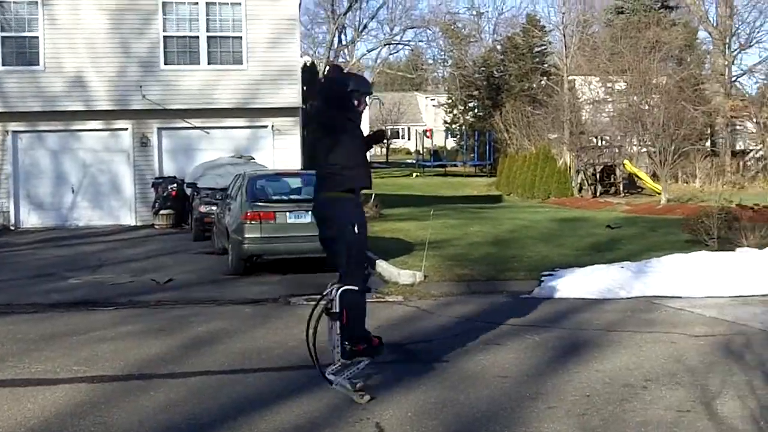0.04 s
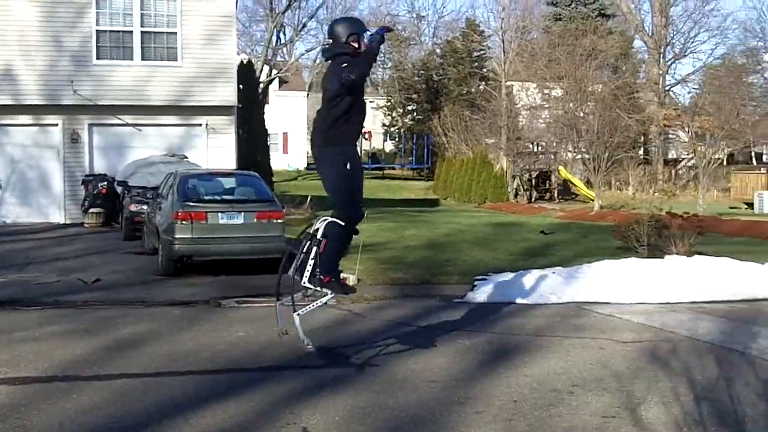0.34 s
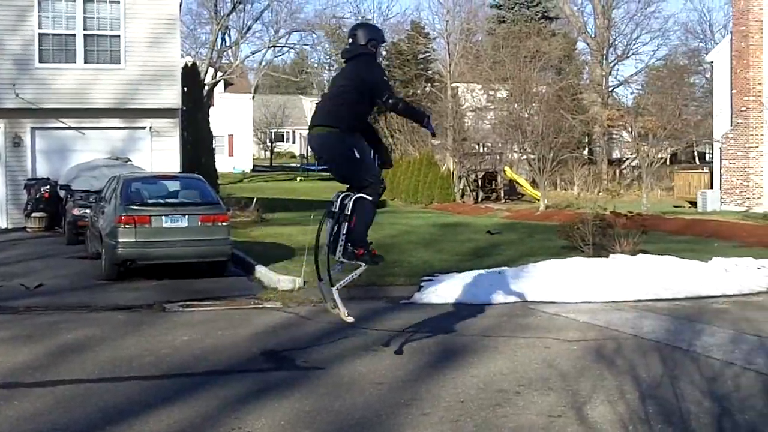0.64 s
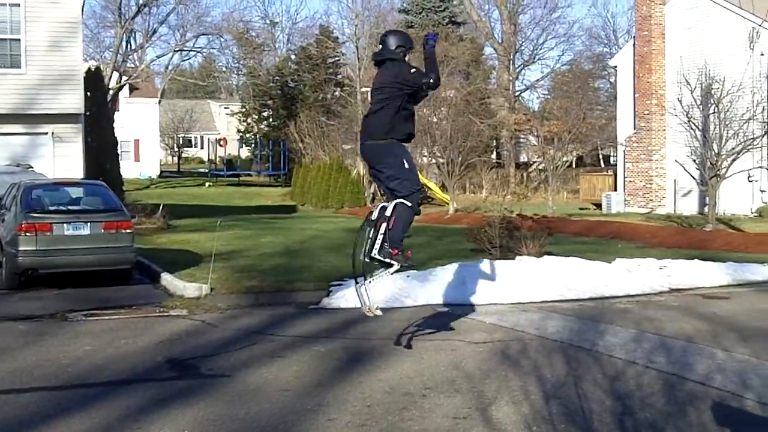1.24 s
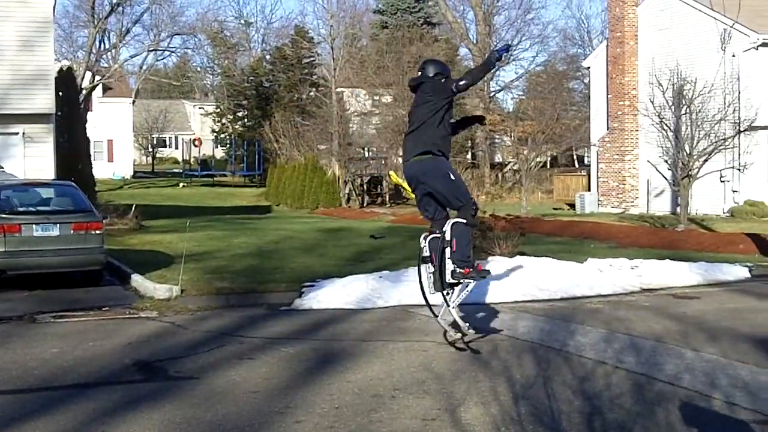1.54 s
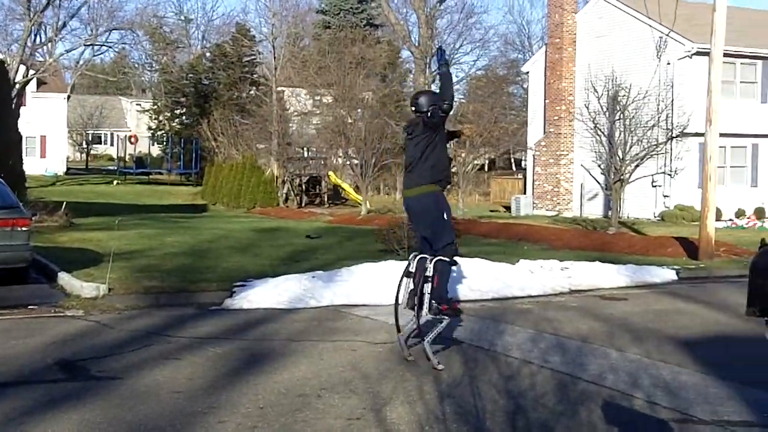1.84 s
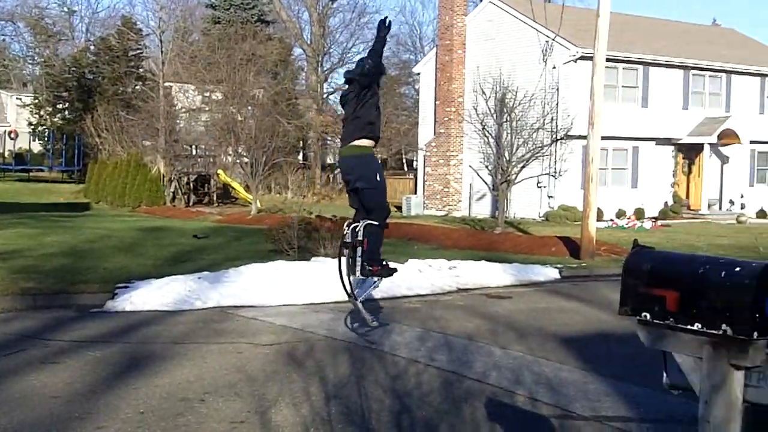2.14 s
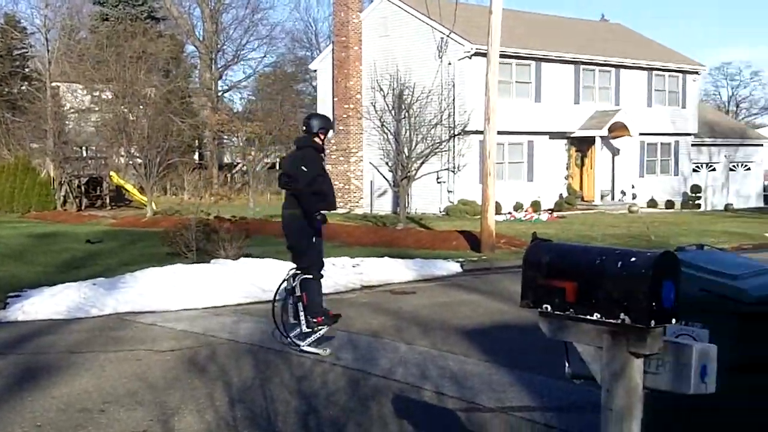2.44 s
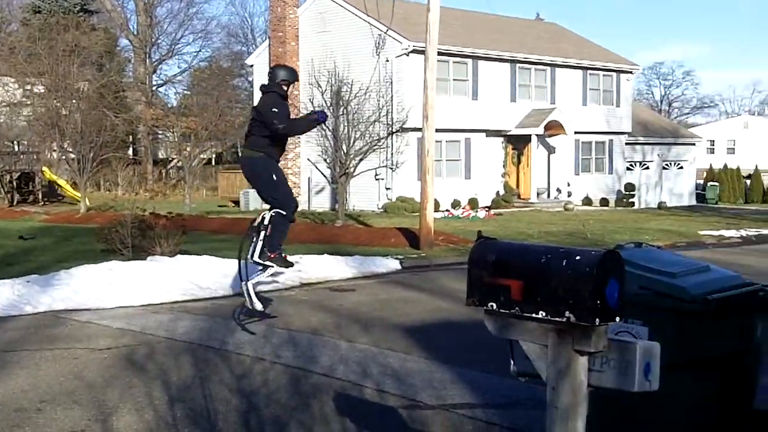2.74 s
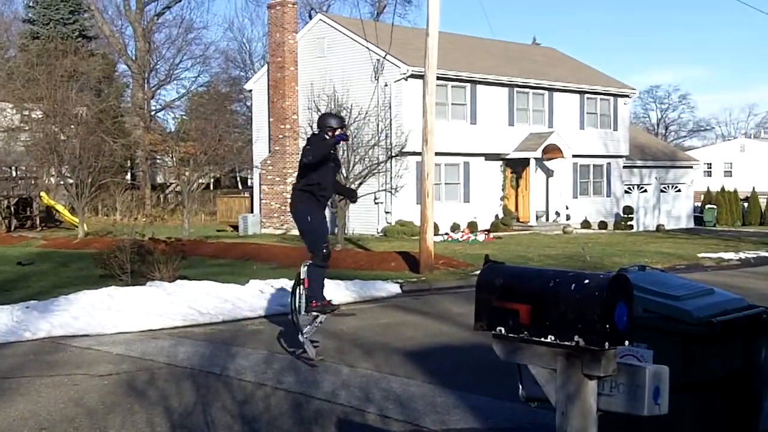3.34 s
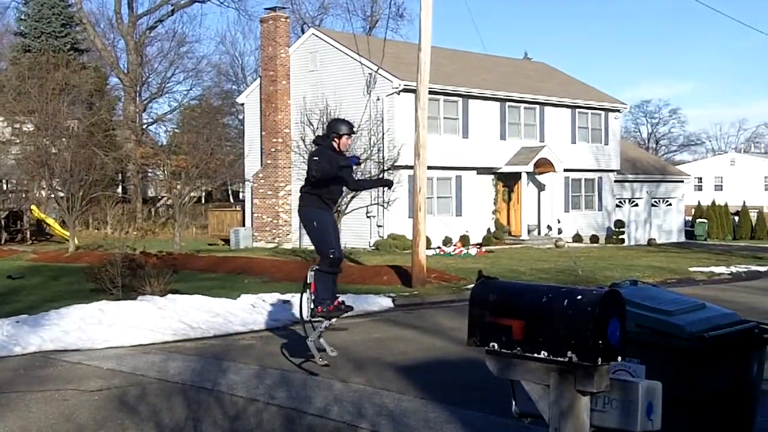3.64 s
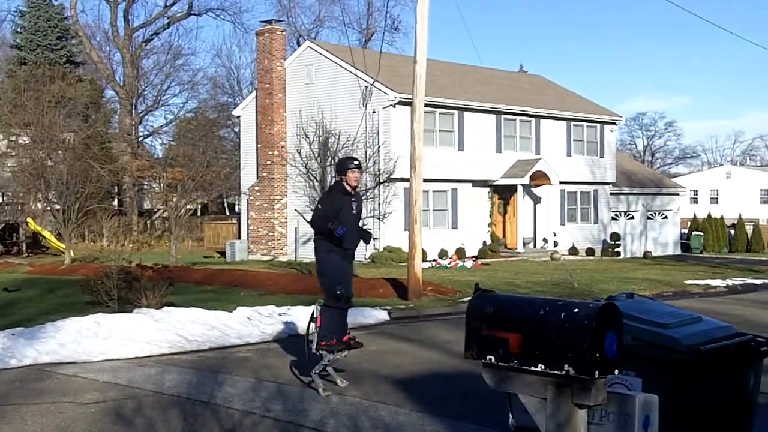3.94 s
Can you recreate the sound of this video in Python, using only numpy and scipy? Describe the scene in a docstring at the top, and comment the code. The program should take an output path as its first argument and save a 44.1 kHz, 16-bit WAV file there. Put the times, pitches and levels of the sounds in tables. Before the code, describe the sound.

Spring stilts land on pavement at about 0.2, 1.0, 1.9, 2.6, 3.3 and 4.0 seconds, each time with a rubbery thump, hollow knock and metal clack that echo thinly off houses. Grit crunches after the landings, and the bindings softly rub, tick and creak between them. Light wind rumbles on the microphone throughout, over faint distant traffic. One far bird calls very faintly near 2.3 seconds.

```python
"""Spring stilts on a suburban street

Someone bounces along, landing about every 0.75 s. Each impact excites a rubber thump, a hollow knock
of the leaf spring and a clack of the metal frame. Friction does the rest: grit crunches as the springs
load, and the bindings rub, tick, stutter and creak. Wind buffets the microphone over distant traffic
and one far bird, and the houses return a thin echo."""
import sys
import numpy as np
from scipy import signal
from scipy.fft import rfft, irfft
from scipy.io import wavfile
from scipy.ndimage import uniform_filter1d

SR = 44100
rng = np.random.default_rng(int(sys.argv[2]) if len(sys.argv) > 2 else 0)


def output_pcm(signal):
    """Save a mono or channel-first signal as 16-bit PCM at the path in sys.argv[1].

    Samples are clipped to [-1, 1] before scaling.
    """
    pcm = np.clip(np.atleast_2d(signal).T, -1, 1) * 32767
    wavfile.write(sys.argv[1], SR, np.round(pcm).astype(np.int16))


N = 176400

# Spectrum of far roads. Each row: frequency in Hz, relative level in dB.
TRAFFIC_SPECTRUM = [(150, -24.5), (250, -11), (370, -10), (600, -6.5), (950, -1), (1300, -4.5),
                    (1730, -7.5), (2650, -18.5), (4500, -30.5), (6500, -30), (9000, -41), (12500, -40.5),
                    (14900, -54)]
# One bird call: start in seconds, length in seconds, level in dB, pitch in Hz, arch as a share of pitch.
BIRD_CALL = (2.335, .1, -49, 1440, .08)
# Spectrum of the wind rumble. Each row: frequency in Hz, relative level in dB.
WIND_SPECTRUM = [(8.8, -31), (15, 13.5), (34, 3), (86, -9.5), (107, -13), (123, -19), (145, -23.5),
                 (178, -34.5), (400, -49), (520, -71), (880, -120)]
# Strength of the rumble. Each row: time in seconds, level in dB.
WIND_LEVELS = [(0, -25), (.55, -20.5), (.95, -29), (1.7, -23), (2.2, -26.5), (2.8, -29), (3.4, -28.5),
               (4, -26.5)]
# Gusts. Each row: centre in seconds, half length in seconds, level in dB, upper frequency in Hz.
GUSTS = [(0.33, 0.03, -28.5, 111), (0.501, 0.046, -29, 142), (0.624, 0.056, -36, 220),
         (1.208, 0.032, -22.5, 99.6), (1.46, 0.066, -30.5, 109), (1.778, 0.034, -27, 129),
         (1.879, 0.0082, -26, 126), (2.38, 0.014, -31.5, 257), (2.66, 0.011, -41.5, 300),
         (3.262, 0.042, -21.5, 36.4), (3.389, 0.0033, -39, 305)]
# Echo from the houses. Each row: frequency in Hz, time to fall 60 dB in seconds.
ECHO_DECAY = [(200, 0.56), (1500, 0.89), (4000, 0.63), (8000, 0.46), (13000, 0.27)]

# Grit under a foot. Each row: start in seconds, length in seconds, level in dB, tilt in dB per octave.
CRUNCHES = [(.232, 0.091, -39.5, 0), (1.062, 0.082, -45, 0.5), (1.14, 0.089, -45, -1.5),
            (1.878, 0.075, -41, 1.3), (2.598, 0.087, -46.5, 0), (3.325, 0.057, -50.5, 2),
            (3.381, .013, -45, -10), (3.451, 0.0081, -40.5, -5)]
# Spectrum of the grit. Each row: frequency in Hz, relative level in dB.
GRIT_SPECTRUM = [(290, -14), (500, -8), (1090, -11), (1300, -5), (2000, 0.5), (3500, -2), (4700, -3),
                 (6300, -4), (9500, -10.5), (12000, -19), (14900, -31)]
# Bindings and clothes rub. Each row: start and length in seconds, level in dB, tilt in dB per octave.
RUBS = [(.09, .06, -57, -12), (.321, .008, -55, 17), (.359, 0.022, -41.5, 3.5), (.375, 0.14, -54, -7),
        (.705, 0.14, -64.5, -4), (.832, 0.073, -57, -4.5), (1.21, 0.17, -52, -10.5), (1.58, 0.073, -65, -1),
        (1.695, 0.071, -63, -5.5), (1.95, 0.13, -67, -5), (2.002, 0.02, -41, -3), (2.03, 0.096, -57, -6.5),
        (2.708, 0.048, -48.5, -10), (2.79, 0.047, -52.5, -4), (3.04, 0.025, -63, -7),
        (3.441, 0.029, -55.5, -1), (3.505, 0.067, -55, -7), (3.612, 0.083, -56.5, -5),
        (3.79, .08, -69.5, -7)]
# Spectrum of rubs, ticks and stutters. Each row: frequency in Hz, relative level in dB.
BINDING_SPECTRUM = [(800, -26), (2000, -4), (3800, -1.5), (5000, -0.5), (6500, 3), (8500, -1.5),
                    (11000, -11.5), (15000, -35)]
# Buckle ticks. Each row: start in seconds, level in dB.
BUCKLE_TICKS = [(.423, -38.5), (.443, -41.5), (.540, -51.5), (0.786, -51), (.95, -47), (1.28, -42),
                (2.058, -42.5), (2.09, -43), (2.679, -47), (2.806, -50), (2.847, -46.5), (3.091, -45.5),
                (3.138, -49)]
# Runs of slips. Each row: start and length in seconds, level in dB, first and last slips per second.
STUTTERS = [(1.134, .034, -52, 190, 120), (1.248, .032, -60, 190, 90), (2.698, 0.034, -49.5, 165, 480)]
# Springs and joints creak. Each row: start and length in seconds, level in dB,
# first and last pitch in Hz, waver as a share of pitch.
CREAKS = [(0.174, 0.039, -53.5, 6200, 6100, .055), (1.173, 0.04, -46, 4100, 3870, 0.039),
          (1.304, .02, -55, 3760, 3610, .05), (2.0145, 0.0077, -37, 3830, 4270, .005),
          (2.022, 0.02, -60, 4300, 4120, .008), (3.457, 0.02, -58, 3890, 4030, .019)]
# Harmonics of a creak, from the fundamental up. Each entry: relative level in dB.
CREAK_HARMONICS = [4, 2, -13]

# Modes of the leaf spring. Each row: frequency in Hz, relative level in dB, seconds to fall 60 dB.
SPRING_MODES = [(322.5, 1.5, 0.049), (440, -1, 0.032), (560, -1, 0.037), (684, -2, 0.026),
                (810, -6.5, 0.038), (1055, -3.5, 0.039)]
# Modes of the metal frame. Each row: frequency in Hz, relative level in dB, seconds to fall 60 dB.
FRAME_MODES = [(1243, 4, 0.011), (1795, -9.5, 0.091), (2124, -1, 0.019), (2812, -13, 0.076),
               (3694, 7.5, 0.015), (3650, -17, 0.061), (6170, -22, 0.054)]
# Spectrum of the frame's clack. Each row: frequency in Hz, relative level in dB.
CLACK_SPECTRUM = [(200, 9), (500, -23.5), (950, -8.5), (1300, 9), (1600, -1.5), (2100, 1), (3000, -5.5),
                  (3800, -7.5), (4900, -9), (6300, -10), (7500, -22.5), (9600, -27), (12000, -44.5),
                  (14900, -57)]
# A foot lands. Each row: time in seconds, thump level in dB, thump pitch in Hz, knock level in dB,
# knock tilt in dB per octave, clack level in dB, clack tilt in dB per octave,
# clack decay constant in seconds, frame ring level in dB.
LANDINGS = [(0.2164, -21, 210, -26, 3.5, -28, 3, 0.0038, -31),
            (0.221, -24, 204, -21.5, 3.5, -14.5, 3.5, 0.0043, -25),
            (1.0443, -20, 162, -21.5, 1, -16, 5, 0.0051, -19),
            (1.8464, -23, 152, -29, -1.5, -18, 6.5, 0.0027, -23),
            (1.867, -18.5, 164, -26, 1, -23, 5, 0.0043, -31),
            (2.586, -20.5, 186, -31, -10.5, -26, 7.5, 0.0032, -28.5),
            (2.594, -30.5, 190, -36.5, 2.5, -32, 1.5, 0.0053, -39),
            (3.303, -20.5, 194, -36.5, 3, -23, -1, 0.0033, -41),
            (3.315, -21.5, 201, -29.5, -2, -19.5, 3, 0.0046, -25.5),
            (3.973, -19, 210, -29.5, -9, -22.5, 3.5, 0.0063, -28.5)]


def amp(db):
    """Amplitude grows tenfold for every 20 dB."""
    return 10 ** (np.asarray(db) / 20)


def unit(x):
    """Normalisation to an rms of 1."""
    return x / np.sqrt(np.mean(x ** 2) + 1e-20)


def read(points, hz):
    """Interpolation of a table on a logarithmic frequency axis."""
    table_hz, value = np.transpose(points)
    return np.interp(np.log(hz + 1), np.log(table_hz + 1), value)


def add(mix, start, sound):
    """Superposition: a sound joins the mix at a time in seconds."""
    part = mix[max(round(start * SR), 0):][:len(sound)]
    part += sound[:len(part)]


def colour(x, spectrum, tilt_db=0):
    """Minimum-phase filtering, tilted per octave above 500 Hz; white noise keeps its power."""
    hz = np.fft.rfftfreq(8192, 1 / SR)
    gain = unit(amp(read(spectrum, hz) + tilt_db * np.log2(np.maximum(hz, 500) / 500)))
    log_gain = np.log(np.maximum(np.r_[gain, gain[-2:0:-1]], 1e-5))
    response = np.exp(np.conj(signal.hilbert(log_gain)))
    taps = np.fft.ifft(response).real[:4096] * np.hanning(8192)[4096:]
    return signal.fftconvolve(x, taps)[:len(x)]


def drift(rate_hz):
    """Low-pass noise: a random fluctuation of rms 1, up to the given rate."""
    hz = np.fft.rfftfreq(N, 1 / SR)
    return unit(irfft(rfft(rng.standard_normal(N)) / (1 + (hz / rate_hz) ** 4), N))


def traffic():
    """Incoherent summation: far roads merge into a nearly steady wash."""
    level_db = -49.5 + .5 * drift(rate_hz=36)
    return amp(level_db) * unit(colour(rng.standard_normal(N), TRAFFIC_SPECTRUM))


def bird():
    """Frequency modulation: a far bird's faint tone arches up and back as it swells and fades."""
    start, length, db, pitch_hz, arch = BIRD_CALL
    out = np.zeros(N)
    swell = np.sin(np.pi * np.arange(0, length, 1 / SR) / length)
    hz = pitch_hz * (1 + arch * swell + 0.017 * drift(rate_hz=200)[:len(swell)])
    add(out, start, amp(db) * swell * np.sin(2 * np.pi * np.cumsum(hz) / SR))
    return out


def wind():
    """Turbulent pressure at the microphone: a lumpy rumble, with short gusts that reach higher."""
    t = np.arange(N) / SR
    rumble = unit(colour(rng.standard_normal(N), WIND_SPECTRUM) * amp(4.4 * drift(rate_hz=3.7)))
    out = rumble * amp(np.interp(t, *np.transpose(WIND_LEVELS)))
    for centre, half_length, db, top_hz in GUSTS:
        swell = np.exp(-((t - centre) / half_length) ** 2)
        eddies = drift(top_hz)
        gust = swell * (eddies - uniform_filter1d(eddies, int(2 * SR / top_hz)))
        out += amp(db) * gust * np.linalg.norm(swell) / np.linalg.norm(gust)
    return out


def street_echo(x, level_db=-15.5, echoes_per_s=2500, onset_s=0.012):
    """Scattering: houses and trees return sparse reflections, each band decaying at its own rate."""
    onset = np.minimum(np.arange(SR) / SR / onset_s, 1)
    reflections = rng.standard_normal(SR) * (rng.random(SR) < echoes_per_s / SR) * onset
    hz, t, bands = signal.stft(reflections, SR, nperseg=256)
    tail = signal.istft(bands * amp(-60 * t / read(ECHO_DECAY, hz)[:, None]), SR)[1]
    return amp(level_db) * signal.fftconvolve(x, tail / np.linalg.norm(tail))[:N]


def friction(strokes, spectrum, slips_per_s, spread_db, rise, fall):
    """Sliding friction: dense, uneven slips swell and fade; rise and fall are shares of a stroke."""
    out, t = np.zeros(N), np.arange(SR // 4) / SR
    for start, length, db, tilt_db in strokes:
        pressure = np.clip(np.minimum(t / length / rise, (1 - t / length) / fall), 0, 1)
        size = amp(spread_db * np.minimum(rng.exponential(1, len(t)), 4))
        slips = unit(size * rng.choice([-1, 1], len(t)) * (rng.random(len(t)) < slips_per_s / SR))
        add(out, start, amp(db) * colour(pressure * slips, spectrum, tilt_db))
    return out


def moving_contact(scrapes, depth_db):
    """Spectral modulation: the colour of a scrape shifts as the contact moves."""
    bands = signal.stft(scrapes, nperseg=256)[2]
    patches = uniform_filter1d(rng.standard_normal(bands.shape), size=3, axis=0)
    patches = unit(uniform_filter1d(patches, size=5, axis=1))
    return signal.istft(bands * amp(depth_db * patches))[1][:N]


def buckles(decay_s=0.0025):
    """Brief impacts have broad spectra: each buckle tick is a bright burst of noise."""
    out, t = np.zeros(N), np.arange(SR // 20) / SR
    for start, db in BUCKLE_TICKS:
        burst = rng.standard_normal(len(t)) * np.exp(-t / decay_s)
        add(out, start, amp(db) * colour(burst, BINDING_SPECTRUM, tilt_db=-4.0))
    return out


def stutters(decay_s=0.0013, scatter_db=3):
    """Slow stick-slip motion: a loaded joint lets go in a run of separate slips."""
    out, t = np.zeros(N), np.arange(SR // 10) / SR
    for start, length, db, first_rate, last_rate in STUTTERS:
        rate = np.interp(t, [0, length], [first_rate, last_rate])
        cycles = np.cumsum(rate) / SR
        size = amp(scatter_db * rng.standard_normal(len(t)))[cycles.astype(int)]
        envelope = size * np.exp(-(cycles % 1) / rate / decay_s) * (t < length)
        envelope /= np.sqrt(np.mean(envelope[t < length] ** 2))
        slips = envelope * rng.choice([-1, 1], len(t))
        add(out, start, amp(db) * colour(slips, BINDING_SPECTRUM, tilt_db=2))
    return out


def creaks(cutoff_hz=10300):
    """Fast stick-slip motion: nearly periodic slips in the joints make short, wavering chirps."""
    out = np.zeros(N)
    for start, length, db, first_hz, last_hz, waver in CREAKS:
        progress = np.arange(0, length, 1 / SR) / length
        glide_hz = first_hz + (last_hz - first_hz) * progress
        hz = glide_hz * (1 + waver * drift(rate_hz=740)[:len(progress)])
        phase = 2 * np.pi * np.cumsum(hz) / SR
        tone = sum(amp(level) * np.sin(k * phase) / (1 + (k * hz / cutoff_hz) ** 8)
                   for k, level in enumerate(CREAK_HARMONICS, 1))
        add(out, start, amp(db) * np.sin(np.pi * progress ** 0.61) * tone)
    return out


def ring(modes, t, tilt_db=0):
    """Free vibration: damped modes, slightly retuned at each blow, tilted per octave above the lowest."""
    out = np.zeros(len(t))
    for hz, db, t60 in modes:
        envelope = amp(db + tilt_db * np.log2(hz / modes[0][0]) - 60 * t / t60)
        tuned_hz = hz * (1 + 0.028 * rng.standard_normal())
        out += envelope * np.sin(2 * np.pi * (tuned_hz * t + rng.random()))
    return out


def landings():
    """Impact excitation: the rubber foot thumps, the leaf spring knocks, the frame clacks and rings."""
    thump_lead_s, thump_peak_s = 0.0031, 0.0034
    knock_lead_s, knock_rise_s = 0.001, 0.00092
    clack_rise_s, clack_hold_s = 0.0015, 0.0017
    out, t = np.zeros(N), np.arange(SR // 8) / SR
    thump_envelope = (t / thump_peak_s * np.exp(1 - t / thump_peak_s)) ** 2
    knock_attack = np.minimum(t / knock_rise_s, 1)
    frame_attack = np.minimum(t / clack_rise_s, 1)
    for at, thump_db, thump_hz, knock_db, knock_tilt, clack_db, clack_tilt, decay_s, ring_db in LANDINGS:
        add(out, at - thump_lead_s, amp(thump_db) * thump_envelope * np.sin(2 * np.pi * thump_hz * t))
        add(out, at - knock_lead_s, amp(knock_db) * knock_attack * ring(SPRING_MODES, t, knock_tilt))
        # The frame's joints chatter for a few milliseconds.
        chatter = frame_attack * np.exp(-np.maximum(t - clack_hold_s, 0) / decay_s)
        clack = colour(chatter * rng.choice([-1, 1], len(t)), CLACK_SPECTRUM, clack_tilt)
        add(out, at, amp(clack_db) * clack + amp(ring_db) * frame_attack * ring(FRAME_MODES, t))
    return out


def scene():
    """Superposition of stilts, street and wind; a little wind differs between the microphone ports."""
    grit = friction(CRUNCHES, GRIT_SPECTRUM, slips_per_s=4000, spread_db=4.2, rise=0.11, fall=0.23)
    rubs = friction(RUBS, BINDING_SPECTRUM, slips_per_s=2500, spread_db=3.8, rise=0.11, fall=0.29)
    direct = landings() + buckles() + stutters() + creaks() + bird()
    direct += moving_contact(grit + rubs, depth_db=3.5)
    centre = direct + street_echo(direct) + wind() + traffic()
    return centre + amp(-33) * np.outer([1, -1], wind())


def record(dry):
    """Self-noise and filtering: the camera adds faint hiss, notches the treble and limits the band."""
    hiss_db, notch_hz, half_width_hz, cutoff_hz = -85, 5416, 317, 15100
    noisy = dry + amp(hiss_db) * rng.standard_normal((2, N))
    offset_squared = ((np.fft.rfftfreq(N, 1 / SR) - notch_hz) / half_width_hz) ** 2
    notched = irfft(rfft(noisy) * (offset_squared + 0.052) / (offset_squared + 1), N)
    lowpass = signal.firwin(511, cutoff_hz, window=("kaiser", 9), fs=SR)
    return signal.oaconvolve(notched, lowpass[None], "same")


dry = scene()
out = record(dry)
output_pcm(out)
```